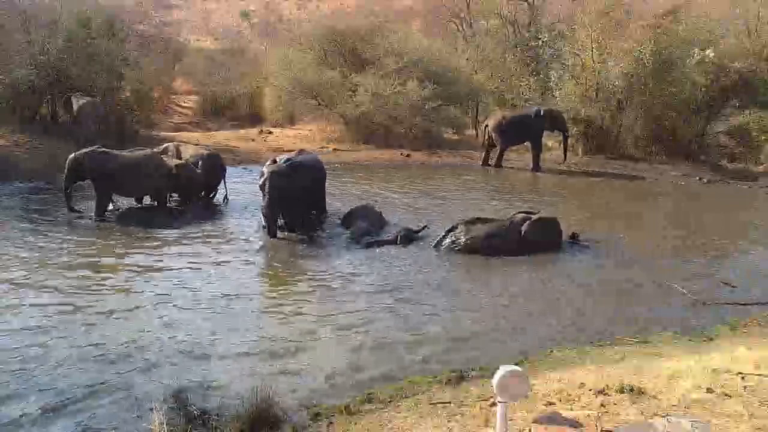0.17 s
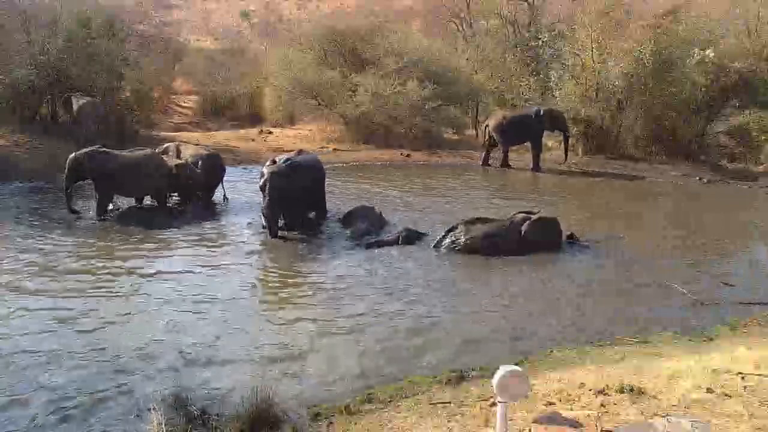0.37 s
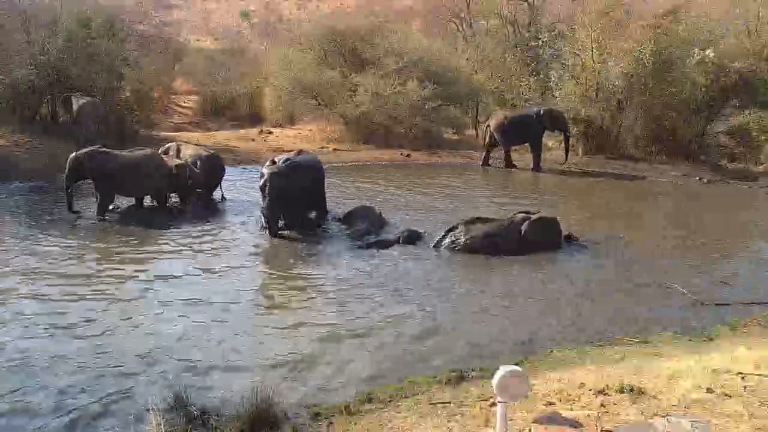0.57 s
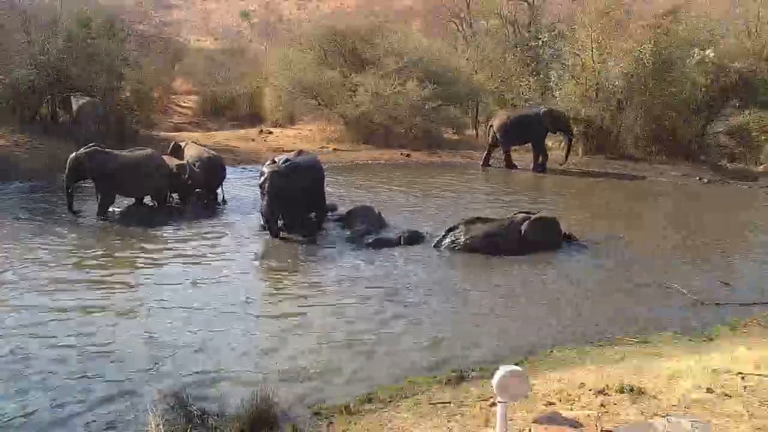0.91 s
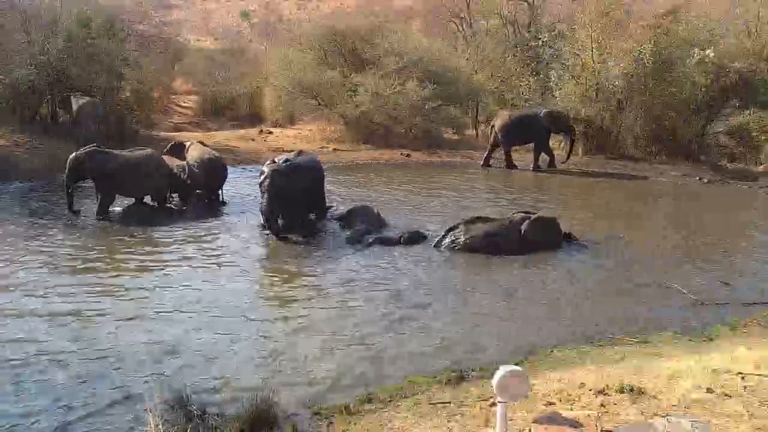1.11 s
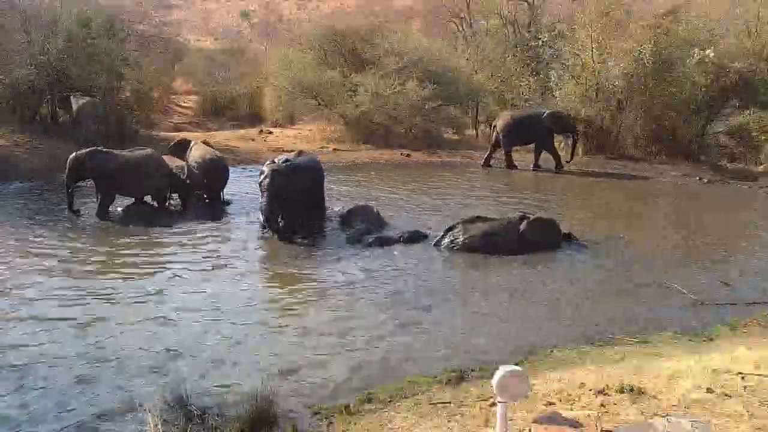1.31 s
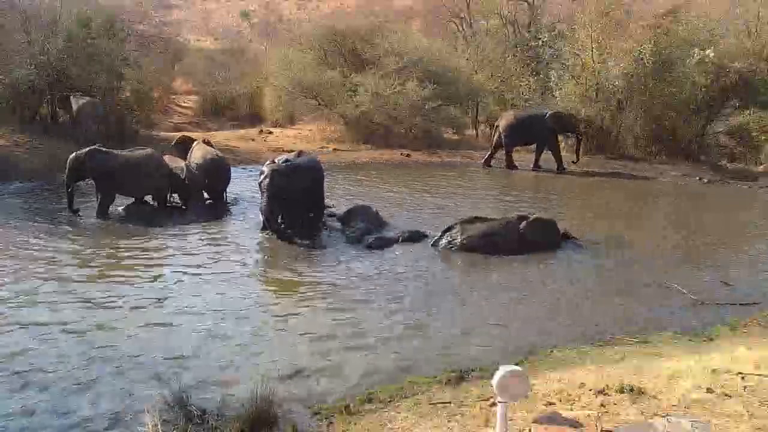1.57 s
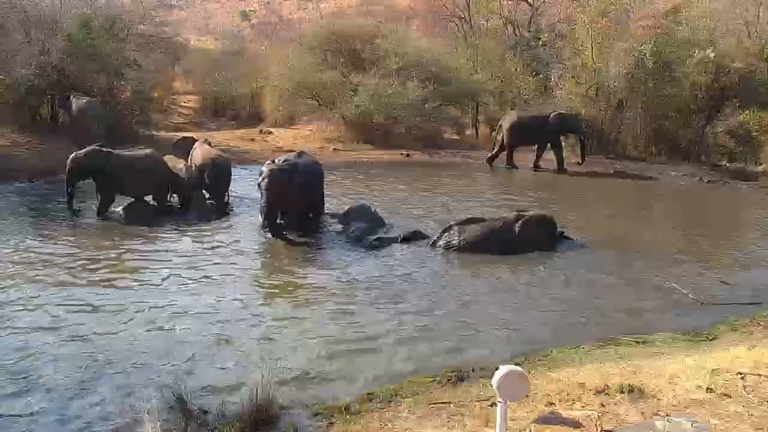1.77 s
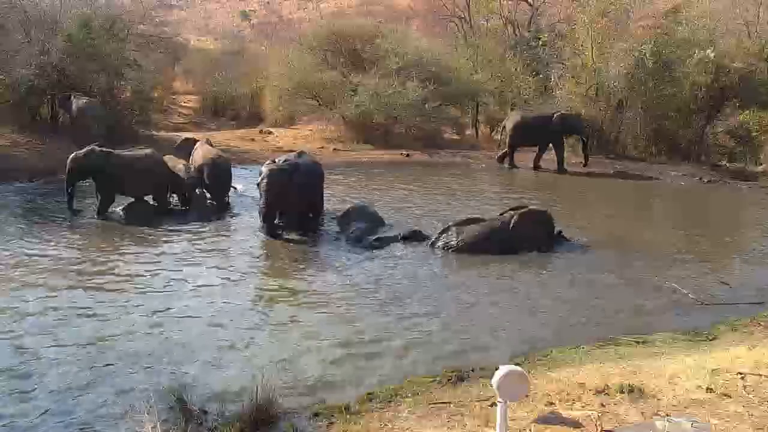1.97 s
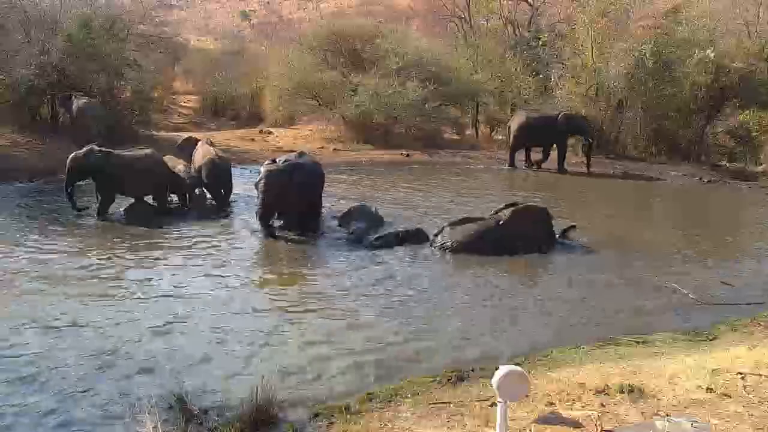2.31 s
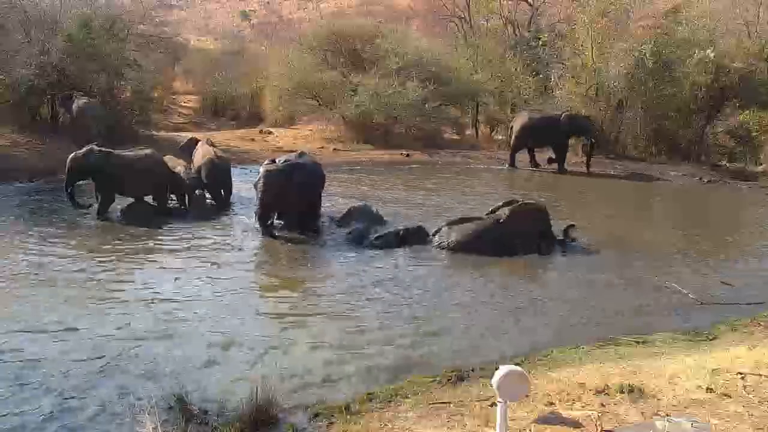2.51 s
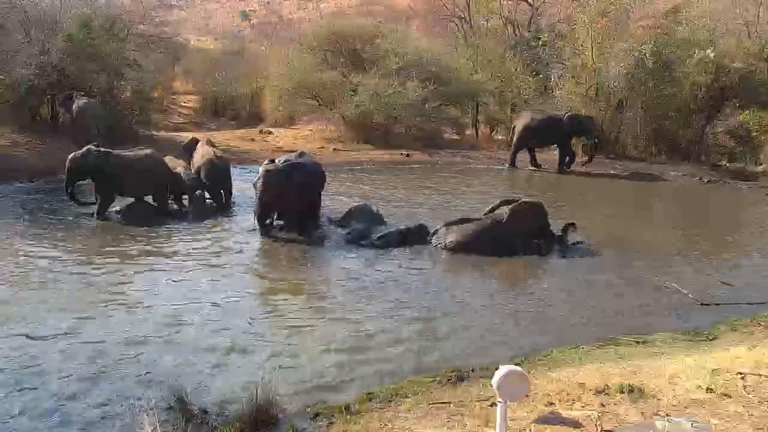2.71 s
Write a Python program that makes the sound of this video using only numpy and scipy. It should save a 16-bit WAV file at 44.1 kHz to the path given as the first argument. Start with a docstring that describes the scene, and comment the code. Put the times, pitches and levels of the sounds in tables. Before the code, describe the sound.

Water sloshes and splashes unevenly as elephants wallow in a shallow waterhole. One heavy plop lands midway, then the churning and gulping carry on. The close microphone gives everything a hollow ring.

```python
"""A shallow waterhole with elephants wallowing, close to a small microphone in a hollow-sounding housing.
From the start churned water sloshes, patters and fizzes over a faint hum and rumble, and the housing
rings at fixed pitches, most of all near 360 Hz. From 0.2 s air pockets gulp and splashes stand out.
At about 1.5 s one heavy plop lands with a low thud; the churning and gulping then carry on."""
import sys
import numpy as np
from scipy import signal
from scipy.fft import rfft, irfft
from scipy.io import wavfile
from scipy.ndimage import uniform_filter1d

SR = 44100
rng = np.random.default_rng(int(sys.argv[2]) if len(sys.argv) > 2 else 0)


def transcribe(u):
    """Save the signal u as a 16-bit wav file named by the first command-line argument.

    u: samples, shape (n,) or (channels, n), limited to [-1, 1]; the rate is SR.
    q: integer samples, one column per channel.
    """
    v = np.clip(np.atleast_2d(u).T, -1, 1)
    q = np.round(v * 32767).astype(np.int16)
    wavfile.write(sys.argv[1], SR, q)


N = 127890

# faint hum under the scene: f/Hz, level/dB
HUM_TONES = [(799, -57.5), (899, -58.5), (1199, -56)]
# broad colour of the microphone housing: f/Hz, gain/dB
HOUSING_COLOUR = [(30, -52), (90, -33.5), (180, -25), (300, -21), (600, -25.5), (1100, -34.5), (1600, -39),
                  (2400, -43.5), (3200, -31.5), (4400, -42), (5600, -44), (7500, -45), (10500, -55)]
# resonances of the housing: f/Hz, width/Hz, lift/dB
HOUSING_RESONANCES = [(366, 118.3, 18.2), (485, 88, 7), (860, 72, 4.1), (1340, 152, 11.25),
                      (1881, 98, 10.6), (2022, 215, 18.4), (2720, 116, 11.9), (2933, 159, 15),
                      (3510, 187, 12.1), (3950, 100, 8.2), (4127, 135, 13.2), (4461, 31, 13.8),
                      (4910, 34, 5.2), (5095, 236, 12.2), (6100, 56, 7.7), (8350, 210, 9.9), (9820, 61, 11),
                      (10852, 106, 8.3)]
# water churned by the animals: t/s, slosh level/dB
SLOSH_LEVELS = [(0, -40.5), (.14, -38.5), (.24, -31), (.32, -36.5), (.47, -28.5), (.62, -32), (.78, -30.5),
                (.94, -31), (1.05, -29.5), (1.2, -32.5), (1.55, -32), (1.68, -34), (1.85, -31), (2.1, -29),
                (2.45, -30), (2.58, -35.5), (2.64, -34.5), (2.9, -34)]
# water thrown about: t/s, patter level/dB, spray level/dB, fizz level/dB
THROWN_LEVELS = [(0, -42, -46.5, -65.5), (.15, -45, -44.5, -61.5), (.38, -43.5, -42, -59),
                 (.52, -40, -40.5, -58.5), (.62, -40.5, -43.5, -61.5), (.8, -37.5, -39.5, -56.5),
                 (.92, -40.5, -40, -60), (1.1, -42, -43.5, -61.5), (1.42, -40.5, -42.5, -59),
                 (1.53, -39.5, -36, -55), (1.7, -38.5, -39, -56), (1.95, -38.5, -38, -55),
                 (2.2, -37.5, -37, -54), (2.46, -35.5, -36, -52.5), (2.57, -43, -41.5, -58.5),
                 (2.9, -40.5, -42.5, -61)]
# bubbles and drops, large to small: low f/Hz, high f/Hz, rate/(1/s), decay/cycles, spread/dB, wash/dB
SLOSH_BUBBLES = (101, 617.5, 648.5, 2.06, 2.5, -5)
PATTER_BUBBLES = (618.5, 2401, 900.5, 3.5, 2, 4.5)
SPRAY_BUBBLES = (2391, 5498, 1288, 5.5, 2, 3.5)
FIZZ_BUBBLES = (5491.5, 11495, 1793, 12.5, 7, 7.5)
# single splashes: t/s, rise/s, decay/s, slosh/dB, patter/dB, spray/dB, fizz/dB
SPLASHES = [(0.201, 0.0055, 0.0099, -33, -33, -56, -68), (.44, 0.019, .025, -37, -55, -38, -62),
            (.495, .018, 0.02, -44, -36, -40, -56), (0.928, .003, 0.031, -34, -46, -32.5, -45),
            (0.98, 0.019, 0.041, -30, -32, -33, -48.5), (1.027, 0.0037, 0.0079, -42, -53, -34, -53),
            (1.172, .014, 0.016, -34, -40, -32, -53), (1.385, .006, .016, -47, -54, -52, -53),
            (1.457, 0.0071, .02, -17, -33, -29.5, -46.5), (1.831, 0.027, 0.017, -41, -41, -33.5, -48),
            (2.615, 0.019, 0.018, -33, -39, -34, -56), (2.735, 0.013, 0.013, -39, -53, -38, -68)]
# gulping air pockets: t/s, length/s, mid-glide f/Hz, relative level/dB
AIR_POCKETS = [(0.207, 0.016, 371.0, -20.5), (0.425, 0.023, 363, -22.5), (0.467, 0.018, 367, -17),
               (0.506, 0.009, 410, -24), (0.641, 0.027, 237, -16.5), (0.681, 0.028, 366, -12),
               (0.697, 0.017, 557, -8), (0.716, 0.0077, 367, -19.5), (0.759, 0.01, 383, -20.0),
               (0.83, 0.029, 341.6, -18.5), (0.883, 0.01, 372, -22), (0.985, 0.036, 170, -13.5),
               (0.995, 0.01, 362, -22), (1.009, 0.029, 329, -21), (1.067, 0.022, 353, -23),
               (1.374, 0.023, 375, -22.5), (1.502, 0.05, 964, -13), (1.588, 0.035, 380, -22.0),
               (1.77, 0.011, 383, -21.5), (1.787, 0.019, 395, -14.5), (1.832, 0.021, 374.0, -13.5),
               (1.854, 0.0058, 372, -31), (1.886, 0.011, 362, -23), (1.919, 0.011, 357, -17.5),
               (1.938, 0.033, 335.7, -13), (1.996, 0.0096, 332, -12.5), (2.016, 0.0066, 365, -13),
               (2.059, 0.029, 338, -14.5), (2.085, 0.039, 193, -14.5), (2.125, 0.018, 375, -15),
               (2.169, 0.032, 380.6, -18.5), (2.251, 0.011, 402, -14), (2.33, 0.018, 356, -17),
               (2.369, 0.022, 360, -19.0), (2.39, 0.037, 370.0, -15), (2.441, 0.006, 361.0, -16.5),
               (2.49, 0.0072, 353, -18), (2.618, 0.02, 319.6, -20)]
# cavities of the heavy plop: t/s, rise/s, decay/s, f/Hz, level/dB ahead of the housing
PLOP_CAVITIES = [(1.4615, 0.00094, 0.011, 395, 2), (1.461, 0.0012, 0.014, 453, -6),
                 (1.471, 0.028, 0.0086, 199, -6)]


def undb(db):
    """Decibels to gain."""
    return 10 ** (np.asarray(db) / 20)


def unit(x):
    """Scale to rms 1."""
    return x / np.sqrt(np.mean(x ** 2))


def curve(table, column):
    """Gain over time from one dB column of a table."""
    rows = np.array(table)
    return undb(np.interp(np.arange(N) / SR, rows[:, 0], rows[:, column]))


def swell(start_s, rise_s, decay_s):
    """A straight rise, then an exponential fall."""
    age = np.arange(N) / SR - start_s
    return np.clip(age / rise_s, 0, 1) * np.exp(-np.maximum(age - rise_s, 0) / decay_s)


def wander(per_s):
    """Random values joined by ramps, at rms 1."""
    hold = int(SR / per_s)
    steps = np.repeat(rng.standard_normal(N // hold + 1), hold)
    return unit(uniform_filter1d(steps, hold)[:N])


def wash(low_hz, high_hz):
    """Smooth noise between two frequencies, at rms 1."""
    band = signal.butter(4, [low_hz, high_hz], btype="band", fs=SR, output="sos")
    return unit(signal.sosfilt(band, rng.standard_normal(N)))


def background():
    """The bed of the place: a faint steady hum and a low rumble that grows with the sloshing."""
    t = np.arange(N) / SR
    hum = sum(undb(db) * np.sqrt(2) * np.sin(2 * np.pi * hz * t) for hz, db in HUM_TONES)
    movement = unit(curve(SLOSH_LEVELS, 1) ** 0.51)
    return hum + undb(-62) * movement * wash(low_hz=22, high_hz=131)


def housing(sound):
    """The hollow housing colours what reaches the microphone and rings at its resonances."""
    size = 8192
    f = np.maximum(np.arange(size // 2 + 1) * SR / size, 1)
    hz, db = np.array(HOUSING_COLOUR).T
    colour_db = np.interp(np.log(f), np.log(hz), db)
    peaks_db = sum(lift / (1 + (2 * (f - centre) / width) ** 2)
                   for centre, width, lift in HOUSING_RESONANCES)
    # minimum phase, so the ring follows the sound that excites it
    cepstrum = irfft(np.log(undb(colour_db + peaks_db)))
    ring = irfft(np.exp(rfft(2 * cepstrum[:size // 2], size) - cepstrum[0]))
    return signal.fftconvolve(sound, ring)[:N]


def bubbles(low_hz, high_hz, per_s, cycles, spread_db, wash_db, glide=0.075):
    """A crowd of bubbles of uneven size, each ringing briefly and rising a little, over a smooth wash."""
    smooth = wash(low_hz, high_hz)
    crowd = np.zeros(N + SR)
    for when, pitch, size, polarity in rng.random((int(per_s * N / SR), 4)):
        hz = low_hz + (high_hz - low_hz) * pitch
        age = np.arange(int(5 * cycles * SR / hz)) * hz / SR / cycles  # in decay times
        size_db = spread_db * min(-np.log(1 - size), 3.5)  # many quiet, a few loud
        gain = undb(size_db) * np.sqrt(hz / low_hz) * np.sign(polarity - .5)
        tone = np.sin(2 * np.pi * cycles * age * (1 + glide * age / 2))
        i = int(when * N)
        crowd[i:i + len(age)] += gain * np.exp(-age) * tone
    return unit(crowd[:N]) + undb(wash_db) * smooth


def churn():
    """Bubbles and drops, heard through the housing, follow the animals and leap up in every splash."""
    layers = [(SLOSH_BUBBLES, curve(SLOSH_LEVELS, 1)), (PATTER_BUBBLES, curve(THROWN_LEVELS, 1)),
              (SPRAY_BUBBLES, curve(THROWN_LEVELS, 2)), (FIZZ_BUBBLES, curve(THROWN_LEVELS, 3))]
    splashes = [(swell(start, rise, decay), dbs) for start, rise, decay, *dbs in SPLASHES]
    surge_db = 0.36 * wander(per_s=16)  # shared by all four layers
    water = np.zeros(N)
    for k, (kind, level) in enumerate(layers):
        flicker_db = 1.02 * wander(per_s=60)
        churn_power = (level * undb(surge_db + flicker_db)) ** 2
        splash_power = sum((shape * undb(dbs[k])) ** 2 for shape, dbs in splashes)
        water += np.sqrt(churn_power + splash_power) * unit(housing(bubbles(*kind)))
    return water


def gulps(glide=0.11, boost_db=2):
    """Air pockets pinch off beside the bodies: short, low, slightly rising tones."""
    out = np.zeros(N + SR)
    for start, length, hz, db in AIR_POCKETS:
        progress = np.arange(int(length * SR)) / (length * SR)
        tone = np.sin(2 * np.pi * hz * length * progress * (1 + glide * (progress - 1) / 2))
        arch = np.sqrt(np.sin(np.pi * progress))
        i = int(start * SR)
        out[i:i + len(tone)] += undb(db + boost_db) * arch * tone
    return out[:N]


def thud():
    """The mass of water pushed aside by the plop gives a brief low thump."""
    envelope = swell(start_s=1.456, rise_s=0.0083, decay_s=0.018)
    return undb(-39.5) * envelope * wash(low_hz=25, high_hz=190)


def plop():
    """A heavy slap opens cavities that ring briefly, the deepest one last."""
    t = np.arange(N) / SR
    return sum(undb(db) * swell(start, rise, decay) * np.sin(2 * np.pi * hz * (t - start))
               for start, rise, decay, hz, db in PLOP_CAVITIES)


def scene():
    """The waterhole at one microphone: water coloured by the housing, over thud, hum and rumble."""
    return (churn() + housing(gulps() + plop()) + thud() + background())[None]


def record(dry, top_hz=11100):
    """The recorder cuts the top steeply."""
    lowpass = signal.ellip(14, .2, 85, top_hz, fs=SR, output="sos")
    return signal.sosfilt(lowpass, dry)


dry = scene()
out = record(dry)
transcribe(out)
```